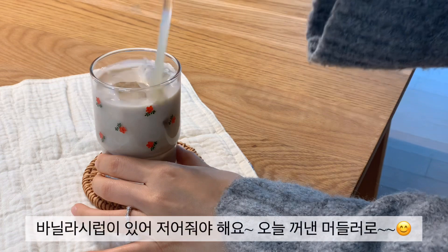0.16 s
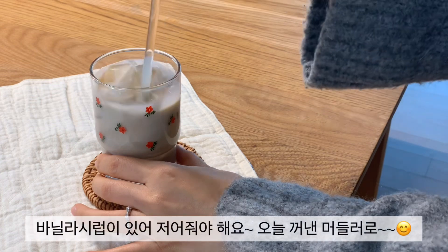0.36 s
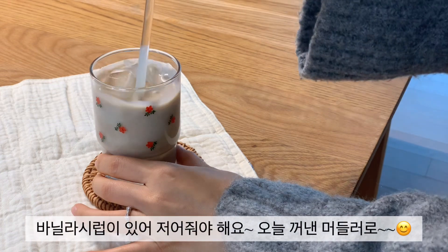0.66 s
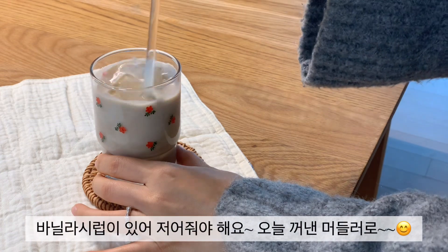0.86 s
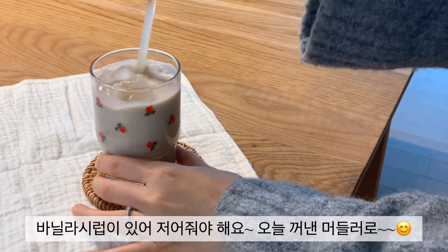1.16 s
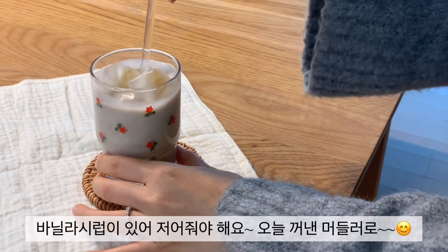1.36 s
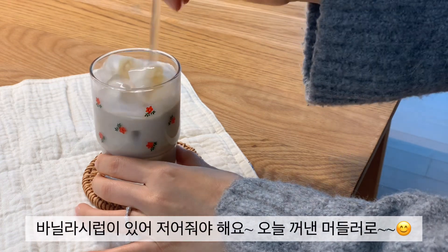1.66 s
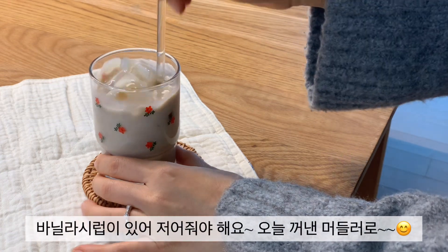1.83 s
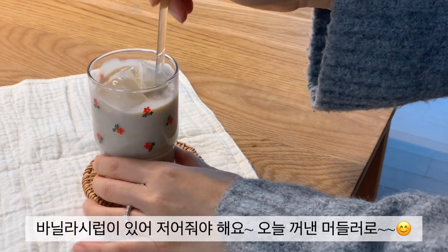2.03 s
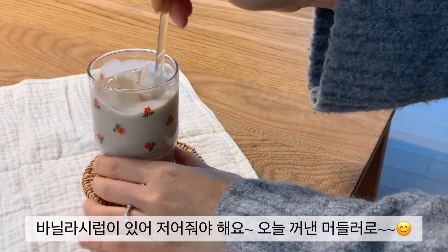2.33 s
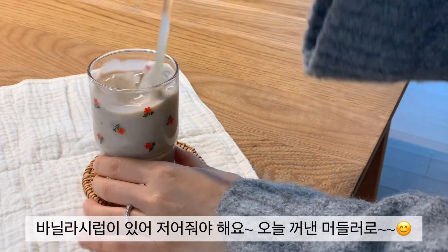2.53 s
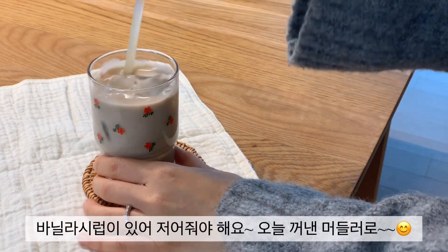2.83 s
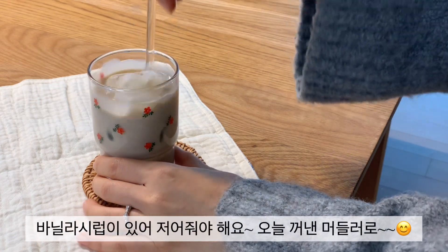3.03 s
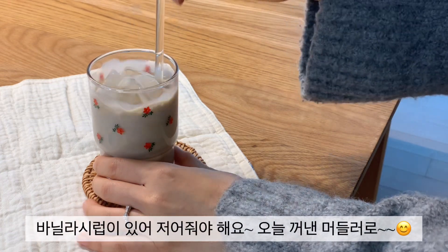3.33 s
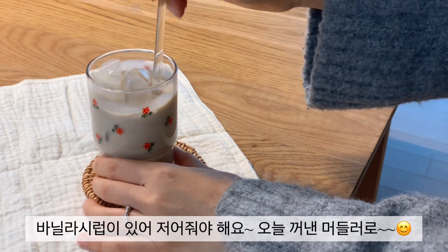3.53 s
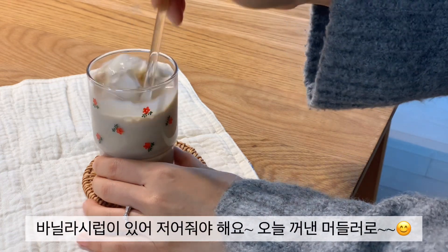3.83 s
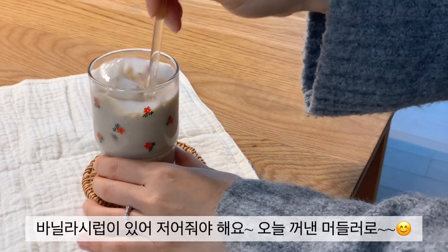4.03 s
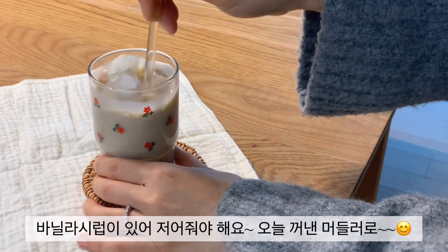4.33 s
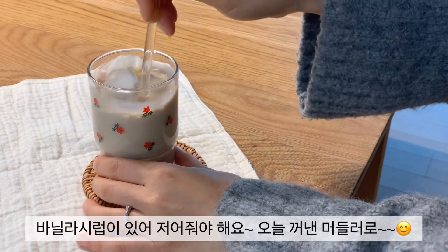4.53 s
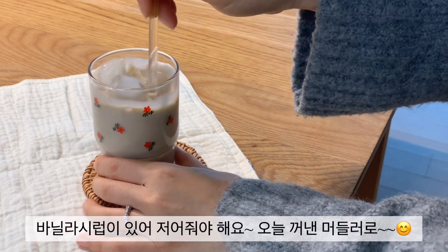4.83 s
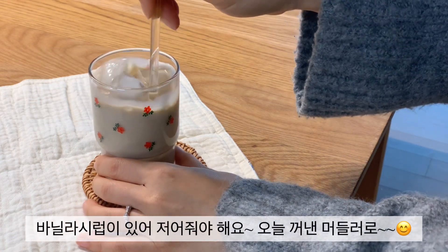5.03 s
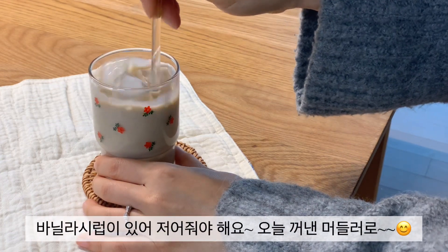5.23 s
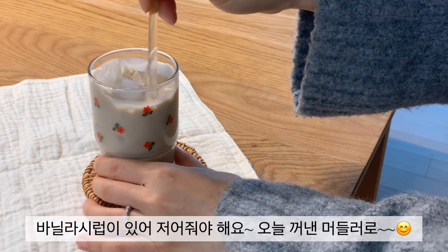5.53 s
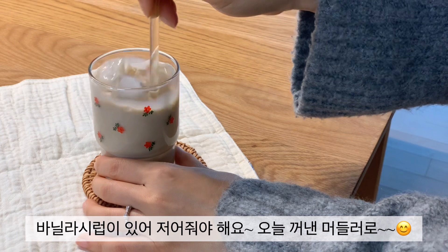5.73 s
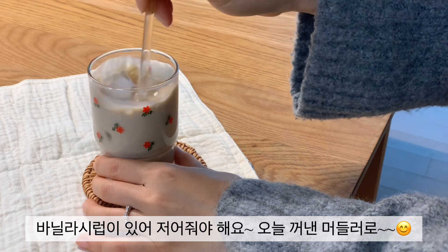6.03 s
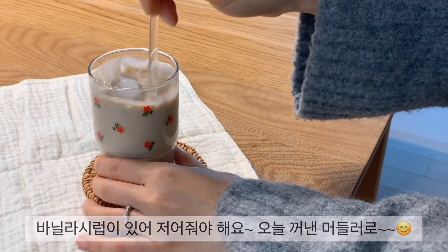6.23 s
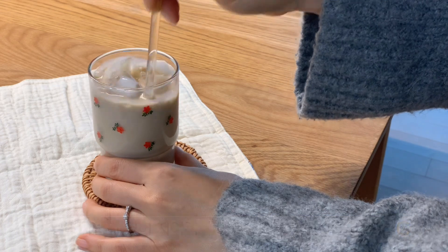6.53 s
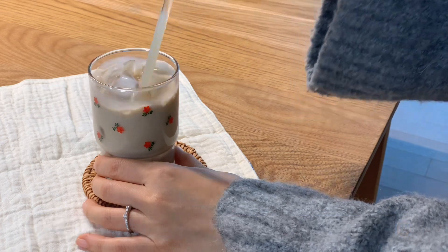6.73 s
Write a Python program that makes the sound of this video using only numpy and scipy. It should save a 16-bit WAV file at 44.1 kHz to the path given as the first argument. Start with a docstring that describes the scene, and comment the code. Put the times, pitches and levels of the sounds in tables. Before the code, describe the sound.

A close stereo pickup of a glass rod stirring an iced milky drink in a tumbler held on a table, in a quiet kitchen with short, faint reverb. From 0 to 0.2 seconds a rapid cluster of bright, brittle clinks; then weak ticks and near quiet until about 1.0, when two sharp clinks lead into light rattling. Around 1.55 to 1.8 comes a dense, piercing run of taps, then a lull. Crisp isolated clinks strike near 2.35, 2.7, 2.8 and 2.9, continuing to 3.25. From about 3.5 to 6.0 stirring becomes steadier, with duller, rounder knocks several times a second and soft ice jostling between. Tiny rising liquid blips hide near 4.3, 5.7 and 6.2. After 6.3 only faint taps remain. Contacts are dry and die almost at once. Underneath lie soft low room tone and a faint, wavering appliance hum.

```python
"""A glass rod stirs a milky iced drink in a tumbler held on a table: rod and cubes clink, thud and jostle.
Each contact is a burst of noise driving tuned resonances of glass and table top; most die in milliseconds.
A few rising sine blips are air pockets bursting between the cubes. The quiet kitchen adds noise reverb,
coloured room tone and the narrow-band hum of a far-off appliance.
Two microphone ports hear the glass out of step, with a phase lead and level tilt that vary with pitch."""
import sys
import numpy as np
from scipy import signal
from scipy.fft import rfft, irfft, next_fast_len
from scipy.io import wavfile
from scipy.ndimage import uniform_filter1d

SR = 44100
rng = np.random.default_rng(int(sys.argv[2]) if len(sys.argv) > 2 else 0)


def store_wav(level_fs):
    """Save 16-bit WAV to argv[1]."""
    pcm = np.round(np.clip(np.atleast_2d(level_fs), -1, 1) * 32767)
    wavfile.write(sys.argv[1], SR, pcm.T.astype(np.int16))


N = 303408

# Room tone spectrum: [f/Hz, relative noise density level/dB]
ROOM_TONE = [(15, -64), (25, -28), (80, -4), (117, -13), (195, -6), (405, -19.5), (734, -32.5),
             (2910, -45.5), (3720, -53), (6210, -32), (7710, -61.5), (9070, -32.5), (16000, -66)]
# Room tone likeness of the two ports: [f/Hz, left-right correlation]
ROOM_TONE_LIKENESS = [(60, 1), (130, 0.88), (290, 0.47), (640, 0.42), (1400, .1), (4000, 0.11)]
# Steady bands of the appliance hum: [f/Hz, nominal width/Hz, level/dB]
HUM_STEADY = [(157.6, 4.6, -73.5), (212, 21, -70), (261.7, 59, -69)]
# Wavering bands of the hum: [f/Hz, nominal width/Hz, level over the swell/dB]
HUM_WAVERING = [(77, 8, -1), (100, 12, -6)]
# Swell of the wavering bands: [t/s, level/dB]
HUM_SWELL = [(0.0, -74), (0.21, -49), (0.65, -79), (0.69, -56), (1.02, -64.5), (1.11, -78), (1.32, -56),
             (1.8, -77.5), (1.93, -55), (2.01, -67), (2.26, -58.5), (2.37, -71), (3.07, -55.5), (3.2, -74),
             (3.43, -53), (3.56, -70), (4.35, -53.5), (4.44, -62), (5.63, -59.5), (5.73, -69),
             (6.71, -59.5), (6.88, -72)]
# Kitchen decay: [f/Hz, t60/s]
ROOM_DECAY = [(500, 0.9), (1300, 0.45), (3500, 0.34), (9000, 0.17), (15000, 0.08)]
# Reverb that differs between the ports: [f/Hz, share of power]
ROOM_APART = [(500, .95), (1500, .92), (3500, .6), (6000, .7), (9000, .08)]
# Phase by which the left port leads: [f/Hz, phase/rad]
PORT_LEAD = [(0, 0), (690, 0.6), (2840, 2.3), (3880, 2.5), (4310, 3.7), (6630, 3.4), (7580, 2.8),
             (8440, 0.9), (9560, -0.2), (11100, -2.7), (12300, -3.7), (13400, -5.9), (15100, -7.2),
             (16300, -10.2)]
# Level of left over right: [f/Hz, level/dB]
PORT_TILT = [(500, 3), (1200, 5), (2000, 0), (2600, -3), (3300, -4.5), (6000, -5), (7000, 0), (8000, 3),
             (9000, 0), (15000, 0)]
# Air pockets bursting between cubes: [t/s, level before the fade-in/dB, starting f/Hz, t60/s]
POCKETS = [(4.314, -35.5, 1533, 0.057), (5.697, -33.5, 1607, 0.052), (6.213, -35, 3250, 0.053)]
# Resonances of the table top that answer a thud: [f/Hz, relative level/dB, t60/s]
TABLE_MODES = [(302, -27, 0.24), (486, -19.5, 0.023)]
# Resonances of the filled tumbler with rod and ice, grouped by pitch range:
# [f/Hz, relative level/dB, t60/s]
THUD_MODES = [(850, -14, 0.0045), (1193, -2, 0.0051), (1397, -2, 0.023), (1659, -1.5, 0.012),
              (2070, -4.5, 0.025)]
BODY_MODES = [(2502, 8.3, 0.0097), (2910, 11.3, 0.0063), (3300, 10.65, 0.018), (4054, 19.1, 0.005),
              (4482, 13.2, 0.0053)]
ROD_MODES = [(5080, 9.2, 0.0029), (5852, 10.35, 0.013), (6563, 17, 0.0046), (7383, 9.5, 0.013)]
TOP_MODES = [(12130, 3.5, 0.02), (12900, -6.5, 0.0015), (14630, -3, 0.0063), (14000, -2, 0.0025),
             (15500, -16.5, .003)]
CLINK_MODES = [(8200, 5.5, 0.0024), (9120, -2, 0.0066), (10100, 4, 0.0063), (11070, 1, 0.0075)]
# Radiation band and detuning by ice and hand, a row per mode group in the order table, thud, body,
# rod, top, clink: [lowest f/Hz, highest f/Hz, detuning as a share of f]
RADIATION = [(197, 910, 0.076), (933, 13000, 0.055), (2010, 9700, 0.045), (4400, 7190, 0.038),
             (11100, 15000, 0.0064), (7630, 14000, 0.0082)]
# Small jostling of cubes: [t/s, relative level/dB]
STIR_LEVEL = [(0.04, -58), (0.2, -49.5), (0.36, -87), (0.65, -83), (0.95, -82), (1.2, -57.5), (1.45, -64.5),
              (1.65, -68.5), (2.1, -73), (2.45, -90), (2.8, -64), (3.1, -55), (3.3, -80.5), (3.55, -58),
              (4.5, -53.5), (5.4, -61.5), (6.05, -61.5), (6.5, -87)]
# Distinct blows, levels before each mode's own: [t/s, clink level/dB, thud level/dB, body level/dB,
# body f/Hz, clink f/Hz, contact chatter/ms]
BLOWS = [(0.0442, -14.5, -38, -42, 4400, 8560, 0.44), (0.053, -23.5, -53, -46, 4230, 8600, 1),
         (0.103, -31, -39, -47, 3210, 10100, 2.2), (0.1123, -14, -36.5, -37.5, 3080, 8740, .8),
         (0.1757, -22.5, -56, -68, 3260, 9300, 1.57), (0.2039, -18, -30.5, -47, 4550, 9340, 0.8),
         (0.404, -57, -50.5, -64.5, 3350, 8700, 1.7), (0.4508, -50.5, -54, -63, 3160, 8900, 2.3),
         (0.5257, -37, -44, -53, 3070, 8400, 0.93), (0.5558, -42, -50, -51.5, 3430, 8550, 0.61),
         (0.617, -36, -37.5, -49, 2290, 9100, 1.7), (0.6376, -41, -34, -49, 3320, 9060, 0.67),
         (0.6567, -33.5, -40.5, -44, 2870, 8770, 4.5), (0.716, -44.5, -52, -68, 3340, 9000, 4.2),
         (0.8243, -45.5, -47.5, -57, 3170, 10500, 3.9), (0.9562, -56, -47.5, -66, 4230, 10400, 0.81),
         (1.0244, -13.5, -41, -36.5, 2500, 8200, 1.46), (1.074, -20.5, -44, -43, 4000, 9100, 1.4),
         (1.1358, -35, -50, -53, 3220, 8800, 1.5), (1.1618, -51.5, -45.5, -59.5, 3140, 8620, 0.8),
         (1.1849, -40, -47, -53, 3280, 8400, 1.1), (1.2134, -37.5, -42.5, -49, 3000, 8650, 1.5),
         (1.2311, -38.5, -48, -44, 3100, 8800, 2.3), (1.3135, -21, -27.5, -31, 3070, 10400, 1.5),
         (1.3583, -27, -41, -38, 2400, 9100, 0.97), (1.529, -62.5, -52, -66, 2930, 9220, 0.77),
         (1.5506, -26.5, -43, -45, 4140, 9260, 0.75), (1.5738, -7.5, -44, -36.5, 3320, 9000, 1.2),
         (1.5904, -46.5, -49.5, -66, 3350, 9230, 2.4), (1.6148, -17, -43, -38.5, 3360, 9100, 0.45),
         (1.6347, -32, -35.5, -47, 3520, 9500, 4.5), (1.6812, -27.5, -32, -44.5, 3370, 9100, 1.2),
         (1.7171, -19.5, -35, -39, 4560, 10100, 1.3), (1.7558, -19.5, -41, -43, 3570, 9200, 1.26),
         (1.8013, -40.5, -46, -59, 3180, 9100, 2.5), (1.9407, -33.5, -40.5, -44, 3440, 10400, 0.77),
         (2.0381, -49, -50, -60.5, 3280, 10100, 2.2), (2.0567, -38.5, -37, -58.5, 3220, 9150, 1.6),
         (2.189, -52.5, -68, -63.5, 3280, 10100, 1.2), (2.2184, -52, -53.5, -54.5, 3360, 8370, 4.2),
         (2.341, -47.5, -46.5, -62, 2850, 9100, 1), (2.351, -18.5, -56, -53, 3480, 9140, 0.63),
         (2.607, -40, -47.5, -58, 3260, 10840, 2.9), (2.665, -40, -51, -59, 2860, 10400, 7.8),
         (2.6781, -7.5, -33, -37.5, 3080, 9050, 0.73), (2.8116, -8.5, -43, -40.5, 2740, 9120, 0.25),
         (2.8232, -41, -46, -61, 3120, 8750, 0.9), (2.9116, -14, -28.5, -32.5, 3540, 10100, 1.5),
         (2.9158, -17.5, -27.5, -42, 2460, 10100, 3.1), (3.025, -16.5, -55, -37, 3480, 10100, 1.3),
         (3.0349, -26, -40.5, -55, 3150, 9100, 1.7), (3.0853, -44, -34, -49, 2920, 8900, 1.2),
         (3.246, -16, -77, -43, 3490, 8880, 1.1), (3.3625, -52.5, -50.5, -69.5, 3240, 8630, 1.5),
         (3.458, -22, -31.5, -37.5, 3580, 10100, 1.5), (3.5992, -35, -71, -46.5, 2400, 8800, 2.9),
         (3.6276, -27, -45.5, -44.5, 3150, 8750, 1), (3.642, -37, -63, -67, 3220, 8760, 1.7),
         (3.7161, -48, -45.5, -57, 3280, 8800, 1.9), (3.7567, -50, -41, -63, 3340, 8700, 1.5),
         (3.7847, -30, -43.5, -44.5, 3600, 10100, 0.98), (3.8813, -30.5, -46, -54, 3230, 8900, 1.35),
         (3.905, -43.5, -40, -46.5, 3380, 9770, 1.5), (3.93, -20.5, -31.5, -34.5, 3880, 10100, 1.5),
         (4.0973, -34, -60, -48.5, 3180, 9000, 1.7), (4.127, -57, -50, -54, 3140, 9560, 2.6),
         (4.155, -18, -30.5, -38, 2500, 10100, 6.3), (4.3249, -34.5, -36, -44, 3240, 9100, 2.2),
         (4.3745, -20, -29.5, -34, 2500, 10400, 1.7), (4.5294, -27.5, -44.5, -50.5, 3070, 9300, 1.6),
         (4.573, -29, -37, -41, 2400, 10200, 1.54), (4.636, -37.5, -38.5, -49, 3130, 8800, 2.1),
         (4.741, -37, -48, -57, 3280, 9000, 1.2), (4.7692, -42, -42, -49, 2800, 8940, 0.87),
         (4.7978, -20.5, -31, -38, 2700, 10200, 3.16), (4.8933, -33.5, -43, -70, 3280, 9250, 0.5),
         (4.9615, -39, -43, -50.5, 3300, 9400, 3.6), (4.995, -28, -37, -43.5, 2450, 10100, 1.07),
         (5.0566, -40, -44, -55, 3300, 8820, 2.5), (5.0832, -38, -45.5, -61, 3280, 9050, 1.5),
         (5.1012, -42.5, -39.5, -47.5, 3420, 9200, 0.73), (5.1911, -28, -45, -51, 3300, 9240, 0.86),
         (5.2518, -16.5, -33, -35.5, 3250, 10100, 2.94), (5.28, -51, -32.5, -56, 2890, 9040, 1.4),
         (5.296, -40, -38, -60, 3100, 10100, 2.2), (5.3982, -34, -40.5, -58.5, 3600, 9050, 1.1),
         (5.4167, -38, -65, -71.5, 3270, 9300, 0.65), (5.443, -38, -44, -50.5, 3170, 10100, 1.3),
         (5.4869, -19, -33, -37, 3080, 10300, 3.1), (5.511, -50, -33.5, -44.5, 3370, 10200, 1.9),
         (5.659, -73, -49, -51.5, 3060, 9650, 3.2), (5.6845, -40.5, -40.5, -48, 2540, 10100, 1.3),
         (5.7545, -38, -37.5, -48.5, 3080, 9100, 0.63), (5.8638, -60, -48, -74, 3160, 8960, 1.2),
         (5.8894, -41.5, -44, -48, 2430, 9180, 2.4), (5.917, -52, -58, -49.5, 3230, 8890, 1.7),
         (5.9755, -37, -35.5, -39, 3100, 9900, 2.2), (5.9812, -24, -32, -35.5, 2620, 10200, 1.77),
         (6.2096, -31, -51, -47.5, 3350, 8400, 0.6), (6.283, -50, -52.5, -58, 3230, 9810, 1.3),
         (6.3139, -25.5, -35, -38, 3350, 10000, 0.98), (6.569, -49.5, -75, -60, 3610, 8830, 1.14),
         (6.7418, -36, -44, -55.5, 3160, 10240, 4.7)]
# Tone as the rod works in the drink: [t/s, central thud f/Hz, top modes below the clink level/dB]
ROD_DEPTH = [(0, 1433, 7), (1.5, 1435, 14.5), (3.2, 1298, 6), (3.6, 1510, 23), (5, 1674, 42),
             (6.88, 1543, 11)]

MODE_GROUPS = [TABLE_MODES, THUD_MODES, BODY_MODES, ROD_MODES, TOP_MODES, CLINK_MODES]

ROOM_TONE_DB = -63
HUM_APART = 0.12   # amplitude of the hum part that is opposite in the two ports
SWELL_EASE_S = .06
ROOM_DB = -11.5
SPOTS, SPOT_S = 3, .11   # blows wander round places, each with its own reverb; time at each
POCKET_RISE_PER_S = 2.7   # pitch gain as a share of the starting pitch
# how far from its pitch a blow still wakes a mode
THUD_REACH_HZ, BODY_REACH_HZ, CLINK_REACH_HZ = 282, 700, 730
JOSTLES_PER_S, JOSTLE_DB, JOSTLE_CLINK_DB = 65, 3.5, -11.5
THUD_SPREAD_HZ = 110   # scatter of thud pitch from blow to blow
BROAD_PER_MS = 0.11   # a longer contact spreads over the wall and wakes modes further off
ROD_BELOW_DB, ROD_CLINK_SHARE = 13, 0.66   # rod rings between clink and body level, less this
TOP_LOSS_DB_PER_MS = 0.5   # a longer, softer contact wakes the top modes less
TOP_LOSS_DB_PER_KHZ, RIM_HZ = 6, 9100   # so does a clink pitched above this
MIC_LOW_HZ, CUTOFF_HZ = 45, 16900


def amp(db):
    """dB to gain."""
    return 10 ** (np.asarray(db) / 20)


def rms_one(x):
    """Scale to unit rms."""
    return x / np.sqrt(np.mean(x ** 2) + 1e-20)


def at_hz(points, hz):
    """Read a table on a log-frequency axis."""
    f, v = np.transpose(points)
    return np.interp(np.log(np.maximum(hz, 1)), np.log(np.maximum(f, 1)), v)


def ring(drive, hz, t60):
    """A damped resonance: a unit click sets a sine of height 1 ringing."""
    r = amp(-60 / (t60 * SR))
    w = 2 * np.pi * hz / SR
    return signal.lfilter([0, np.sin(w)], [1, -2 * r * np.cos(w), r * r], drive + 1e-18)


def bands():
    """Half-octave band filters with their centres."""
    edges = 25 * 2 ** np.arange(0, 9.6, .5)
    return [(signal.butter(2, [low, high], "band", fs=SR, output="sos"), np.sqrt(low * high))
            for low, high in zip(edges, edges[1:])]


def hush():
    """Room tone: noise coloured band by band, most alike in both ports in the bass."""
    tone = 0
    white = rng.standard_normal((2, 2, N))
    for k, (sos, hz) in enumerate(bands()):
        mid, side = signal.sosfilt(sos, white[k % 2])   # neighbouring bands use separate noise
        alike = np.clip(at_hz(ROOM_TONE_LIKENESS, hz), -1, 1)
        pair = np.sqrt(1 + alike) * mid + np.sqrt(1 - alike) * side * [[1], [-1]]
        tone = tone + amp(at_hz(ROOM_TONE, hz)) * pair
    return amp(ROOM_TONE_DB) * rms_one(tone)


def narrow(lines):
    """Noise in narrow bands, each resonance applied twice, nearly alike in both ports."""
    mix = np.array([[1, HUM_APART], [1, -HUM_APART]])
    total = 0
    for hz, width, db in lines:
        t60 = 1.1 / width
        noise = ring(ring(rng.standard_normal((2, N)), hz, t60), hz, t60)
        total = total + amp(db) * rms_one(mix @ noise)
    return total


def hum():
    """A distant appliance: narrow low bands of noise, the lowest swelling and sinking."""
    swell = amp(np.interp(np.arange(N) / SR, *np.transpose(HUM_SWELL)))
    eased = uniform_filter1d(swell, round(SWELL_EASE_S * SR))
    return eased * narrow(HUM_WAVERING) + narrow(HUM_STEADY)


def kitchen(x):
    """Reverb as noise dying band by band: one part common to both ports, one apart in each."""
    t = np.arange(round(.6 * SR)) / SR
    tail = np.zeros((SPOTS, 3, len(t)))   # per place: common, left, right
    for sos, hz in bands()[7:]:
        own = np.clip(at_hz(ROOM_APART, hz), 0, 1)
        share = np.sqrt([[1 - own], [own], [own]])
        noise = signal.sosfilt(sos, rng.standard_normal(tail.shape))
        tail += share * noise * amp(-60 * t / at_hz(ROOM_DECAY, hz))
    first_walls = np.clip((t - .002) / 0.00067, 0, 1)   # silent for 2 ms, then a quick rise
    tail *= first_walls * amp(ROOM_DB - 23)
    spot = (np.arange(N) / SR // SPOT_S) % SPOTS
    wet = 0
    for k in range(SPOTS):
        from_spot = (x * (spot == k))[None]
        wet = wet + signal.fftconvolve(from_spot, tail[k], axes=1)[:, :N]
    return wet[0], wet[1:]


def ports(x):
    """Two ports hear one source with a phase lead and level tilt that change with pitch."""
    size = next_fast_len(N + 4096)
    hz = np.arange(size // 2 + 1) * SR / size
    lead = np.interp(hz, *np.transpose(PORT_LEAD))
    half = amp(at_hz(PORT_TILT, hz) / 2) * np.exp(.5j * lead)   # left gets half, right its inverse
    return irfft(rfft(x, size) * np.array([half, 1 / half]), size)[:, :N]


def blips():
    """Air pockets burst: each rings as a sine that rises a little while it dies."""
    out = np.zeros(N)
    t = np.arange(round(.08 * SR)) / SR
    for s, db, hz, t60 in POCKETS:
        phase = 2 * np.pi * hz * (t + POCKET_RISE_PER_S * t ** 2 / 2)
        tone = np.sin(phase) * (1 - np.exp(-t / 0.0046))
        out[round(s * SR):][:len(t)] += amp(db - 60 * t / t60) * tone
    return out


def woken(modes, db, pitch_hz, reach_hz):
    """Where a blow lands decides which mode it wakes most; others lose up to 12 dB."""
    return [db - np.minimum(6 * ((pitch_hz - hz) / reach_hz) ** 2, 12) for hz, _, _ in modes]


def strike(times, chatter_s, group_db):
    """Wet surfaces chatter briefly at each contact and drive every mode with its own strength and tuning."""
    t = np.arange(round(.012 * SR)) / SR
    starts = np.round(times * SR).astype(int)
    index = np.minimum(starts[:, None] + np.arange(len(t)), N - 1)
    decay = np.exp(-t / np.clip(chatter_s, 1e-4, .005)[:, None])
    fade = decay * (1 - np.exp(-t / 0.00024))
    fade = fade / np.sqrt(np.sum(fade ** 2, axis=1, keepdims=True))
    out = np.zeros(N)
    for modes, mode_db, (low, high, detune) in zip(MODE_GROUPS, group_db, RADIATION):
        group = np.zeros(N)
        for (hz, own_db, t60), db in zip(modes, mode_db):
            force = fade * rng.standard_normal(fade.shape)
            load = rng.integers(-1, 2, len(times))   # ice and hand: flat, true or sharp
            probe = np.exp(2j * np.pi * hz * np.outer(1 + detune * load, t))
            felt = np.abs(np.sum(force * probe, axis=1))   # drive at the mode's pitch
            force *= (amp(db + own_db) / np.maximum(felt, .45))[:, None]   # even out the drive
            for k in (-1, 0, 1):
                chosen = load == k
                drive = np.bincount(index[chosen].ravel(), force[chosen].ravel(), N)
                group += ring(drive, hz * (1 + detune * k), t60)
        radiates = signal.butter(3, [low, high], "band", fs=SR, output="sos")
        out += signal.sosfilt(radiates, group)
    return out


def jostling():
    """Cubes bump softly at random while the rod turns them, each bump in a place of its own."""
    luck = rng.random((round(JOSTLES_PER_S * N / SR), 5))
    s = luck[:, 0] * N / SR
    stir_db = np.interp(s, *np.transpose(STIR_LEVEL))
    db = stir_db + JOSTLE_DB - 2.12 * np.log(luck[:, 1] + 0.00083)   # a few bumps stand out
    hard = db + JOSTLE_CLINK_DB + 12 * (luck[:, 2] - .5)
    thud_hz = 1000 + 1100 * luck[:, 3]
    body_hz = 2300 + 2200 * luck[:, 4]
    group_db = [[db] * len(TABLE_MODES),
                woken(THUD_MODES, db, thud_hz, THUD_REACH_HZ),
                woken(BODY_MODES, db - 11, body_hz, BODY_REACH_HZ),
                [hard - 11] * len(ROD_MODES),
                [hard - 20] * len(TOP_MODES),
                [hard] * len(CLINK_MODES)]
    return s, np.full(len(s), .001), group_db


def knocks():
    """Distinct blows of rod and cubes: hardness, place and contact time set which modes speak."""
    s, clink_db, thud_db, body_db, body_hz, clink_hz, chatter_ms = np.transpose(BLOWS)
    when, pitch_hz, below_db = np.transpose(ROD_DEPTH)
    thud_hz = np.interp(s, when, pitch_hz) + THUD_SPREAD_HZ * rng.standard_normal(len(s))
    broad = 1 + BROAD_PER_MS * chatter_ms
    rod_db = ROD_CLINK_SHARE * clink_db + (1 - ROD_CLINK_SHARE) * body_db - ROD_BELOW_DB
    top_db = clink_db - np.interp(s, when, below_db) - TOP_LOSS_DB_PER_MS * chatter_ms
    top_db -= TOP_LOSS_DB_PER_KHZ * np.maximum(clink_hz - RIM_HZ, 0) / 1000
    group_db = [[thud_db] * len(TABLE_MODES),
                woken(THUD_MODES, thud_db, thud_hz, THUD_REACH_HZ * broad),
                woken(BODY_MODES, body_db, body_hz, BODY_REACH_HZ * broad),
                [rod_db] * len(ROD_MODES),
                [top_db] * len(TOP_MODES),
                woken(CLINK_MODES, clink_db, clink_hz, CLINK_REACH_HZ)]
    return s, chatter_ms / 1000, group_db


def together(*kinds):
    """Join several kinds of contact into one list, since they ring the same modes."""
    times, chatter_s, group_db = zip(*kinds)
    joined = [np.concatenate(group, axis=1) for group in zip(*group_db)]
    return np.concatenate(times), np.concatenate(chatter_s), joined


def scene():
    """Glass and air pockets through room and ports, over room tone and hum."""
    glass = strike(*together(knocks(), jostling())) + blips()
    common, apart = kitchen(glass)
    return ports(glass + common) + apart + hush() + hum()


def record(dry):
    """The microphone cuts the deep bass; a steep filter cuts the extreme top."""
    bass_cut = signal.butter(3, MIC_LOW_HZ, "high", fs=SR, output="sos")
    top_cut = signal.cheby2(12, 70, CUTOFF_HZ, fs=SR, output="sos")
    return signal.sosfilt(top_cut, signal.sosfilt(bass_cut, dry))


dry = scene()
out = record(dry)
store_wav(out)
```